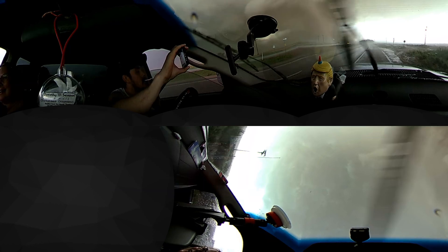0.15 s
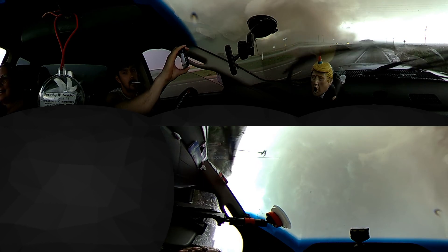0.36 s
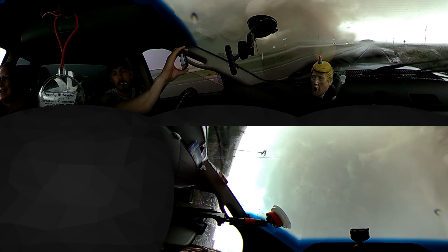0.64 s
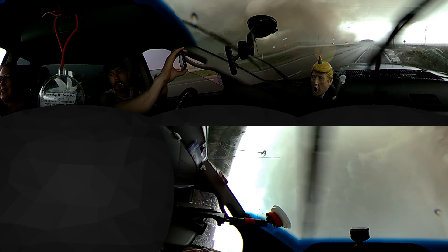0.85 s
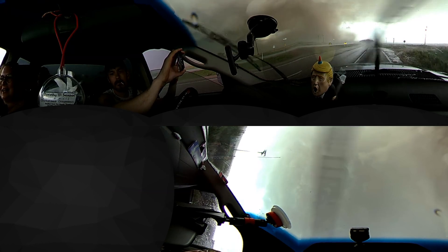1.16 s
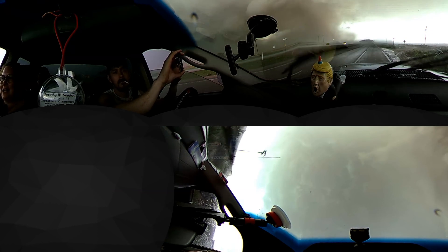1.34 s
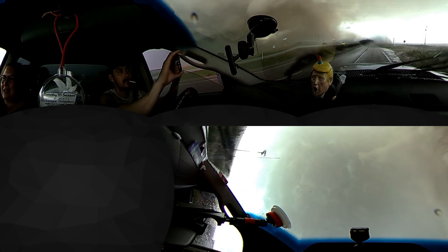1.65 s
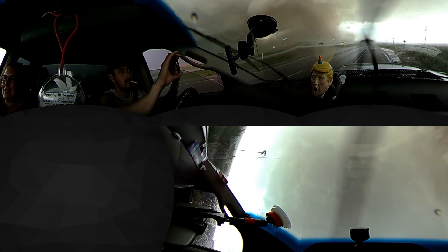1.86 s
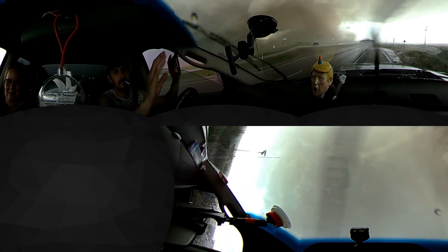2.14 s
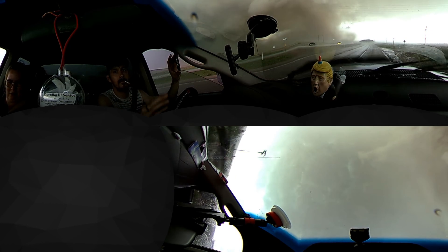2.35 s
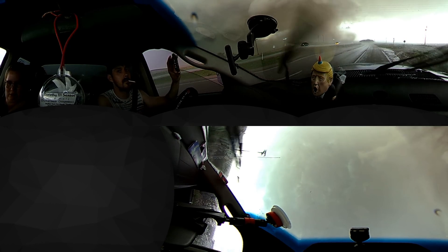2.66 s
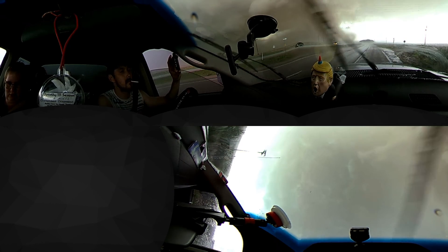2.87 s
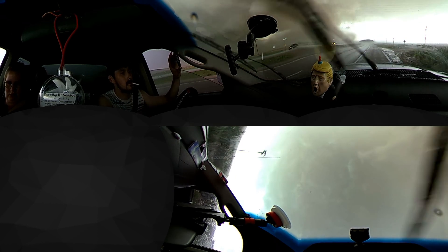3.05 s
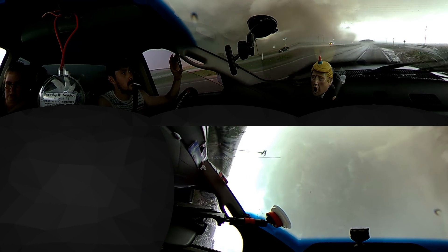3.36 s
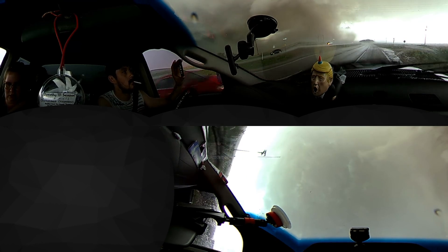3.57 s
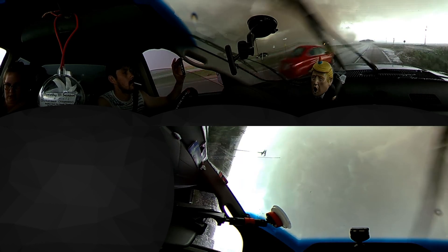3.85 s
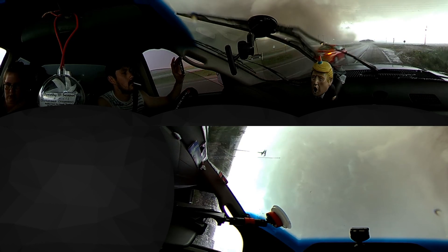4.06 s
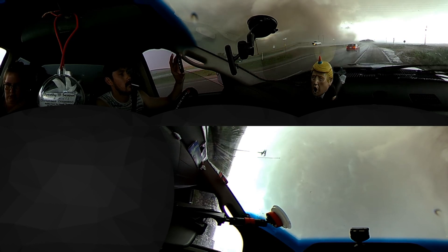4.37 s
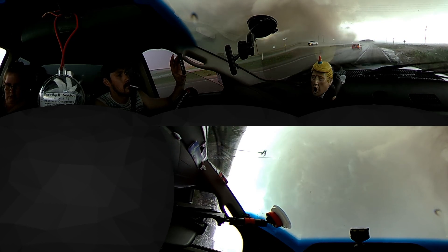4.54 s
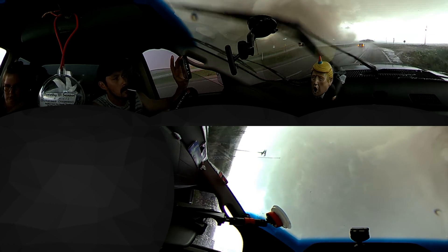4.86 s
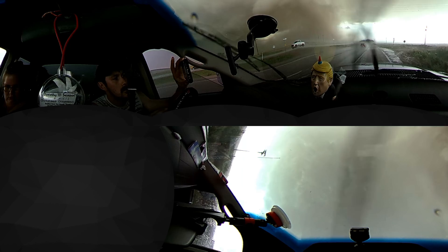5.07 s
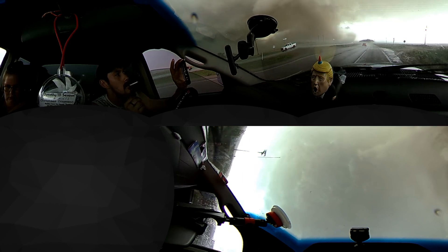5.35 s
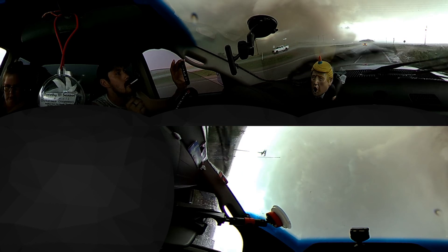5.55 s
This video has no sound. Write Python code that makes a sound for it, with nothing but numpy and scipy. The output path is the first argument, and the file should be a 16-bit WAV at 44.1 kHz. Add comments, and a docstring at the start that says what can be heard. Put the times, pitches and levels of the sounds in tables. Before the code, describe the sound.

Heard from inside a car driving through a cloudburst, close, dry and mono. Rain is dense but uneven: crisp mid-to-high crackle on the windshield, woody rattle on the body panels, dull drumming through the lined roof. Short sheets of water slap the car several times a second, each surging and stopping quickly. From 0 to 1 s, low roof thuds and hollow panel knocks come thickly, strongest around 0.35-0.9 s. More scattered blows follow to 2.2 s, with a sharp knock near 1.7 s; the rain eases around 2.3-2.7 s. At 2.8-3.5 s a fresh burst brings thuds, hard knocks and bright smacks. Afterwards heavy blows nearly vanish, leaving splashy sheets and single fat drops ticking on glass until 5.7 s. Throughout, deep tyre rumble and an unsteady, very low air throb persist, with short wind gusts shaking the cabin more often after 2 s.

```python
"""Rain patters in uneven sheets over a low road rumble: a car in a cloudburst, heard from the cabin.
Showers of short noise bursts make the glass, panel and roof rain; filters give each its colour.
Panel knocks, roof thuds and fat smacks with bright splashes are single tuned bursts on top.
Filtered noise makes the rumble, swollen by gusts; a wandering low tone makes the cabin air throb."""
import sys
import numpy as np
from scipy import signal
from scipy.fft import rfft, irfft
from scipy.io import wavfile
from scipy.ndimage import uniform_filter1d

SR = 44100
rng = np.random.default_rng(int(sys.argv[2]) if len(sys.argv) > 2 else 0)


def put_to_file(sound):
    """Save the sound as 16-bit audio at rate SR, in the file named by the first command-line argument."""
    columns = np.atleast_2d(sound).T  # one column per channel
    safe = np.clip(columns, -1, 1)
    whole_steps = np.round(safe * 32767)
    wavfile.write(sys.argv[1], SR, whole_steps.astype(np.int16))


N = 251811  # length in samples

# Levels of hits are gains set ahead of the colour filters.
# steady rain between the sheets: t/s, glass level/dB, roof level/dB
DOWNPOUR = [(0.0, -38.5, -33.5), (0.68, -44, -32.5), (1.3, -44.5, -30), (1.72, -44.5, -29),
            (1.92, -46.5, -40), (2.05, -53.5, -28.5), (2.45, -47, -28.5), (2.64, -49, -36),
            (3.0, -37, -32.5), (3.5, -40.5, -31), (3.73, -46, -37), (4.2, -42.5, -30), (5.5, -41.5, -35.5),
            (5.71, -47, -45)]
# sheets of water thrown against the car: start t/s, length t/s, glass level/dB, panel level/dB, roof level/dB
SHEETS = [(0.07, 0.12, -45, -36, -30.5), (0.312, 0.11, -40, -32, -40), (0.476, 0.15, -43, -38.5, -33),
          (0.735, 0.12, -42, -35.5, -30), (0.821, 0.11, -53, -35.5, -25), (0.976, 0.19, -50, -50, -34),
          (1.138, 0.21, -42.5, -42, -48), (1.335, 0.11, -38.5, -40, -41), (1.488, 0.1, -38, -35, -34.5),
          (1.632, 0.073, -38.5, -41, -35), (1.819, 0.04, -36, -34, -27), (1.952, 0.047, -41.5, -46, -38),
          (2.021, 0.134, -40.5, -40, -44), (2.164, 0.09, -43.5, -43, -39), (2.37, 0.11, -39.5, -39.5, -47),
          (2.84, 0.07, -50, -46, -21.5), (2.906, 0.15, -37.5, -36.5, -25), (3.106, 0.15, -46, -42, -30.5),
          (3.257, 0.054, -34, -35, -41), (3.346, 0.092, -35.5, -32.5, -45), (3.455, 0.21, -36.5, -32, -28),
          (3.795, 0.13, -36, -35.5, -28.5), (4.084, 0.1, -37.5, -36.5, -51),
          (4.202, 0.169, -36.5, -35.5, -31), (4.526, 0.11, -45.5, -47, -52),
          (4.703, 0.12, -35.5, -38.5, -35), (4.965, 0.077, -41, -40.5, -24),
          (5.129, 0.154, -40, -42.5, -28.5), (5.3, 0.13, -43, -45, -33.5), (5.459, 0.065, -42.5, -40, -28),
          (5.552, 0.1, -38.5, -37, -31.5)]
# drops that knock on a body panel: t/s, level/dB, pitch of the spot f/Hz
KNOCKS = [(0.338, -18, 570), (0.377, -9, 560), (0.469, -11, 1400), (0.541, -20, 574), (0.751, -20, 1270),
          (0.812, -26, 1390), (0.849, -18, 617), (0.893, -18, 795), (1.263, -15.5, 610), (1.675, -9, 1410),
          (2.771, -25.5, 1220), (2.834, -11, 1770), (3.129, -13.5, 700), (3.265, -8, 1400),
          (3.383, -24, 1310), (3.514, -12.5, 848), (3.85, -31.5, 760)]
# heavy blows of water on the roof: t/s, level/dB, pitch of the spot f/Hz
THUDS = [(0.052, -10.5, 214.7), (0.34, -8, 192), (0.378, -15, 161), (0.537, -10.5, 158), (0.563, -7, 209),
         (0.631, -13.5, 202), (0.788, -11, 153), (0.847, -5, 172), (0.892, -7, 116), (1.073, -18.5, 227),
         (1.385, -15, 191), (1.49, -12.5, 217), (1.543, -15, 141), (1.78, -11, 201), (1.996, -15, 247),
         (2.156, -10.5, 148), (2.218, -16, 133), (2.845, -11.5, 103), (2.954, -13, 232),
         (3.126, -18.5, 198), (3.204, -17, 264), (3.627, -18, 105)]
# gusts of wind that shake the cabin: start t/s, length t/s, level/dB
GUSTS = [(0.11, 0.08, -31), (1.41, 0.077, -35), (2.05, 0.22, -23), (2.33, 0.18, -32), (2.8, 0.27, -24.5),
         (3.13, 0.15, -24), (3.57, 0.12, -20), (3.84, 0.18, -23.5), (4.17, 0.22, -26), (4.7, 0.2, -23.5),
         (5.11, 0.16, -28), (5.41, 0.059, -24), (5.57, 0.11, -22.5)]
# fat drops on the glass: t/s, level/dB, pitch of the spot f/Hz, splash level/dB relative to the smack
FAT_DROPS = [(0.0857, -20.5, 6020, -22), (0.218, -17.5, 3420, -11), (0.2844, -25.5, 7080, -6),
             (0.685, -25.5, 5850, -24), (0.7511, -17.5, 7100, -4), (0.9811, -16, 5300, -19),
             (0.9833, -31, 6170, 15), (1.019, -22, 5200, -14), (1.257, -21.5, 2690, -41.5),
             (1.454, -23.5, 5450, -25.5), (1.5966, -26.5, 5010, -1), (1.737, -29, 3400, -7),
             (2.0307, -29.5, 5740, -20), (2.3303, -19, 3300, -5), (2.713, -28.5, 5270, -6.5),
             (2.77, -28.5, 5920, -23), (2.8323, -20.5, 5500, -29), (2.8488, -27, 4970, -27),
             (3.1103, -22, 6500, -13.5), (3.1251, -16, 4530, -22.5), (3.128, -12.5, 3280, -17),
             (3.265, -16.5, 6400, -27), (3.5467, -18.5, 4700, -20), (3.842, -19, 2780, -18),
             (3.987, -32, 6350, 0), (4.1548, -24.5, 5930, -12), (4.309, -23.5, 5280, -10),
             (4.4236, -27, 3870, -16), (4.804, -23.5, 5600, -5), (4.9836, -24.5, 7000, -3),
             (5.1415, -26, 5900, -22), (5.231, -24, 5800, -2), (5.3997, -26, 4240, 1)]

# colour of rain on the windshield: f/Hz, relative level/dB
GLASS_COLOUR = [(1000, 5), (2000, 6), (2800, 0.5), (4000, 2.5), (5200, 3), (6200, 1.5), (7500, -1),
                (10000, -5), (12500, -3), (16000, -10.5)]
# colour of rain on the body panels: f/Hz, relative level/dB
PANEL_COLOUR = [(250, 7.5), (450, 11), (650, 8), (820, 4), (980, 0), (1180, 5), (1400, 5), (1800, -4.5),
                (2400, -15.5), (3300, -11), (5000, -32.5), (8000, -32)]
# colour of the hollow knocks: f/Hz, relative level/dB
KNOCK_COLOUR = [(250, 34), (500, 9.5), (800, 7.5), (980, 3.5), (1400, 7), (2000, 5), (4000, -43.5)]
# colour of rain through the lined roof: f/Hz, relative level/dB
ROOF_COLOUR = [(50, -15), (85, 4), (140, 4), (205, 3), (290, -7), (370, -6.5), (520, -20.5), (850, -18),
               (1600, -63)]
# colour of the heavy roof blows: f/Hz, relative level/dB
THUD_COLOUR = [(60, -13), (110, 2.5), (170, 4.5), (210, 10), (290, -9.5), (370, -1.5), (560, -16),
               (850, -22), (1600, -40)]
# colour of the road rumble: f/Hz, relative level/dB
RUMBLE_COLOUR = [(14, 11.5), (28, -6), (40, 5), (56, 5), (75, -2.5), (120, -13), (250, -33), (600, -44)]
# colour of the fat drops' smacks: f/Hz, relative level/dB
SMACK_COLOUR = [(1200, 0.5), (2400, 4), (3300, 3), (5500, 4.5), (7500, 1.5), (10000, -8.5), (12500, -2.5),
                (16000, -26)]
# colour of the fat drops' splashes: f/Hz, relative level/dB
SPLASH_COLOUR = [(5000, -10), (8500, 8), (12500, 2), (16000, 7)]
# resonances of the cabin and its trim: f/Hz, width f/Hz, lift level/dB
CABIN = [(184.5, 1.9, 1), (327, 13, -1), (567, 3.3, 3.5), (1140, 16, 5.5), (4350, 32, -4), (5200, 40, 0)]

SHEET_ATTACK_S, SHEET_RELEASE_S, SHEET_CREST_DB = 0.053, 0.014, 1
GUST_ATTACK_S, GUST_RELEASE_S, GUST_CREST_DB = 0.038, 0.056, -2  # negative: the middle dips
PANELS_OVER_GLASS_DB = 1  # in the steady rain
HISS_DB = -54  # constant part of the spray on the glass
ROAD_DB = -31
BUFFET_HZ, BUFFET_DB = 15, -21  # centre values; both wander
BUFFET_SKEW = 0.18  # share of the octave that makes each throb lopsided
BUILD_UP_S = 0.0052  # hold before a burst dies away
SMACK_T60_S = 0.057
CUTOFF_HZ = 15900


def windshield(flow):
    """More water on the glass brings more drops; fine spray fills the gaps between them."""
    per_s = 450 * flow / np.mean(flow)
    drops = shower(per_s, spread_db=3.8, t60=.04, contact=2.2, low_hz=2000, high_hz=11000, lift_db=9)
    spray_gain = from_db(-11.5) * flow + from_db(HISS_DB)
    spray = spray_gain * rng.standard_normal(N)
    return colour(flow * drops + spray, GLASS_COLOUR)


def body_panels(flow):
    """Hood, doors and pillars rattle under the rain; now and then a big drop gives a hollow knock."""
    drops = shower(per_s=380, spread_db=6.5, t60=0.046, contact=1.5, low_hz=434, high_hz=3060, lift_db=9.5)
    knocks = place((s, db, blow(hz, t60=0.07, contact=0.4, width_share=0.14, lift_db=13))
                   for s, db, hz in KNOCKS)
    return flow * colour(drops, PANEL_COLOUR) + colour(knocks, KNOCK_COLOUR)


def roof(flow):
    """The lined roof passes only the dull part of each impact; heavy blows ring at their spot's pitch."""
    drops = shower(per_s=170, spread_db=3.5, t60=0.11, contact=5.5, low_hz=87, high_hz=410, lift_db=-1.5)
    thuds = place((s, db, blow(hz, t60=0.1, contact=3.0, width_share=0.04, lift_db=8))
                  for s, db, hz in THUDS)
    return flow * colour(drops, ROOF_COLOUR) + colour(thuds, THUD_COLOUR)


def road_and_wind():
    """Tyre rumble swells with the gusts; wind buffets the cabin air into an unsteady throb."""
    gust_power = swells(GUSTS, GUST_ATTACK_S, GUST_RELEASE_S, GUST_CREST_DB)
    strength = np.sqrt(from_db(ROAD_DB) ** 2 + gust_power)
    rumble = strength * colour(rng.standard_normal(N), RUMBLE_COLOUR)

    throb_hz = BUFFET_HZ * (1 + 0.2074 * drift(4.45))
    phase = 2 * np.pi * np.cumsum(throb_hz) / SR
    throb = np.sin(phase) + BUFFET_SKEW * np.sin(2 * phase)
    swell_db = 1.5 * drift(3)
    return rumble + from_db(BUFFET_DB + swell_db) * np.sqrt(2) * throb


def fat_drops():
    """Each fat drop smacks on the glass and bursts into a brief bright splash."""
    smacks = place((s, db, blow(hz, SMACK_T60_S, contact=0.28, width_share=0.12, lift_db=5.5))
                   for s, db, hz, splash_db in FAT_DROPS)
    splashes = place((s, db + splash_db, ring(t60=0.013) / 2) for s, db, hz, splash_db in FAT_DROPS)
    return colour(smacks, SMACK_COLOUR) + colour(splashes, SPLASH_COLOUR)


def water_on(steady_db, sheet_db):
    """Strength of the water on one surface: steady rain and sheets add in power."""
    start, length = np.transpose(SHEETS)[:2]
    sheets = swells(zip(start, length, sheet_db), SHEET_ATTACK_S, SHEET_RELEASE_S, SHEET_CREST_DB)
    return np.sqrt(from_db(steady_db) ** 2 + sheets)


def swells(rows, attack_s, release_s, crest_db):
    """Power of (start s, length s, dB) surges: each rises, bows up or down in the middle, and falls."""
    t, power = np.arange(N) / SR, np.zeros(N)
    for start, length, db in rows:
        rise = np.clip((t - start) / attack_s + .5, 0, 1)
        fall = np.clip((start + length - t) / release_s + .5, 0, 1)
        gate = rise * fall
        on = gate > 0
        arch = np.sin(np.pi * np.clip((t[on] - start) / length, 0, 1)) - .5
        power[on] += (gate[on] * from_db(db + crest_db * arch)) ** 2
    return power


def shower(per_s, spread_db, t60, contact, low_hz, high_hz, lift_db, count=40):
    """Uneven drops land at random on many spots, each with its own ring and pitch; rms near 1."""
    pitches = np.geomspace(low_hz, high_hz, count)
    # neighbouring spots push in opposite directions
    spots = [(-1) ** k * blow(hz, t60, contact, 0.037, lift_db) for k, hz in enumerate(pitches)]
    chance = rng.random(N)
    spot = rng.integers(0, count, N)
    bulk = np.minimum(rng.exponential(1, N), 3)
    landings = np.flatnonzero(chance < per_s / SR)
    out = place((i / SR, spread_db * bulk[i], spots[spot[i]]) for i in landings)
    # the flow of water over a tenth of a second stays even
    return out / np.sqrt(np.abs(uniform_filter1d(out ** 2, SR // 10)) + 1e-12)


def blow(hz, t60, contact, width_share, lift_db):
    """A sharp push at contact, then a ring tuned at the pitch of the spot without changing its energy."""
    sound = ring(t60) / 3
    sound[0] += contact
    tuned = resonate(sound, hz, width_share * hz, lift_db)
    return tuned * np.sqrt(np.sum(sound ** 2) / np.sum(tuned ** 2))


def ring(t60):
    """Crowded modes of a struck pane: noise holds while the first cabin echoes arrive, then dies away."""
    t = np.arange(SR // 8) / SR
    decay_db = -60 * np.maximum(t - BUILD_UP_S, 0) / max(t60, .004)
    return rng.standard_normal(len(t)) * from_db(decay_db)


def resonate(x, hz, width_hz, lift_db):
    """Raise or lower one resonance in a sound by mixing in a two-pole band."""
    r = np.exp(-np.pi * width_hz / SR)
    poles = [1, -2 * r * np.cos(2 * np.pi * hz / SR), r * r]
    band = signal.lfilter([1, 0, -1], poles, x) * (1 - r * r) / 2
    return x + (from_db(lift_db) - 1) * band


def place(hits):
    """Lay (s, dB, sound) hits on the time line."""
    out = np.zeros(N + SR)
    for s, db, sound in hits:
        at = max(round(s * SR), 0)
        out[at:at + len(sound)] += from_db(db) * sound
    return out[:N]


def colour(x, spectrum):
    """Causal (minimum-phase) filter with the given spectrum; white noise keeps its power."""
    size = 2 ** 13
    octaves = np.log2(np.maximum(np.arange(size // 2 + 1), 1) * SR / size)
    hz, db = np.transpose(spectrum)
    # beyond the end points the level falls 12 dB per octave
    outside = np.abs(octaves - np.clip(octaves, np.log2(hz[0]), np.log2(hz[-1])))
    gain = rms_one(from_db(np.interp(octaves, np.log2(hz), db) - 12 * outside))
    # folding the cepstrum puts the energy as early as possible
    cepstrum = irfft(np.log(gain))[:size // 2]
    cepstrum[1:] *= 2
    impulse = irfft(np.exp(rfft(cepstrum, size)))
    return signal.oaconvolve(x, impulse)[:N]


def drift(rate):
    """Slow random wander with spread 1: noise smoothed by two poles at rate Hz."""
    step = 40  # samples between drawn points
    r = np.exp(-2 * np.pi * rate * step / SR)
    noise = rng.standard_normal(N // step + 2002)
    slow = signal.lfilter([1], [1, -2 * r, r * r], noise)[2000:]  # skip the settling
    return np.interp(np.arange(N) / step, np.arange(len(slow)), rms_one(slow))


def in_time(rows):
    """Each column of a curve, sample by sample."""
    s, *columns = np.transpose(rows)
    return [np.interp(np.arange(N) / SR, s, c) for c in columns]


def from_db(db):
    """Decibels to gain."""
    return 10 ** (np.asarray(db) / 20)


def rms_one(x):
    """Scale to rms 1."""
    return x / np.sqrt(np.mean(x ** 2) + 1e-20)


def scene():
    """Water on glass, panels and roof passes the cabin resonances, then road and wind join in mono."""
    glass_db, roof_db = in_time(DOWNPOUR)
    _, _, on_glass, on_panels, on_roof = np.transpose(SHEETS)
    rain = (windshield(water_on(glass_db, on_glass))
            + body_panels(water_on(glass_db + PANELS_OVER_GLASS_DB, on_panels))
            + roof(water_on(roof_db, on_roof))
            + fat_drops())
    for hz, width_hz, lift_db in CABIN:
        rain = resonate(rain, hz, width_hz, lift_db)
    return (rain + road_and_wind())[None]


def record(dry):
    """Soft saturation rounds the peaks, then a steep low-pass cuts the top."""
    ceiling = 1.1
    rounded = ceiling * np.tanh(dry / ceiling)
    low_pass = signal.ellip(10, .1, 90, CUTOFF_HZ, fs=SR, output="sos")
    return signal.sosfilt(low_pass, rounded)


dry = scene()
out = record(dry)
put_to_file(out)
```